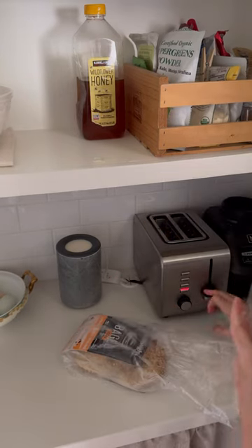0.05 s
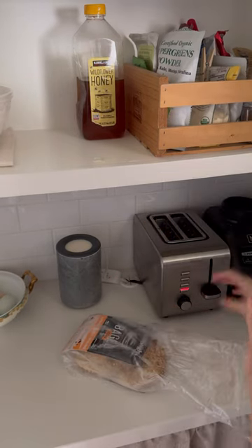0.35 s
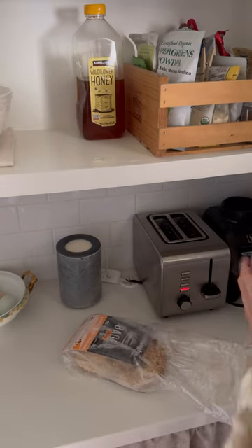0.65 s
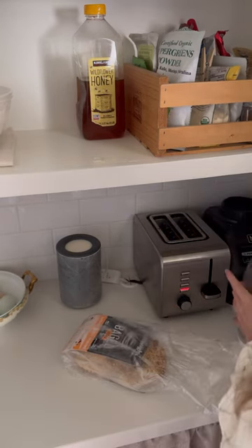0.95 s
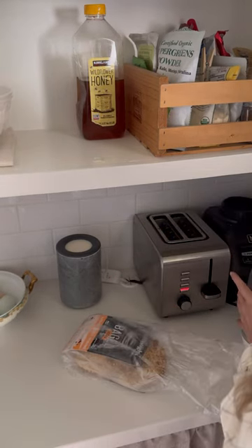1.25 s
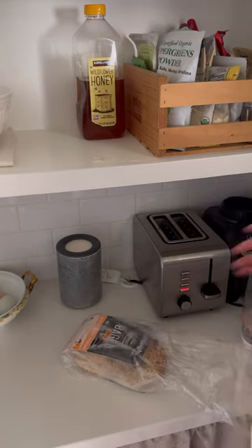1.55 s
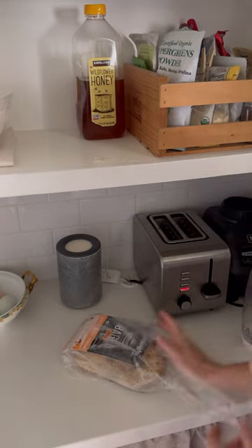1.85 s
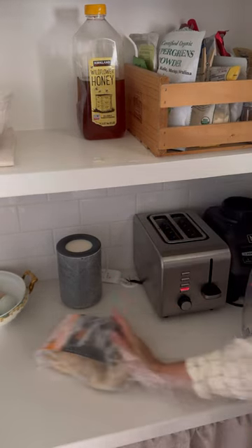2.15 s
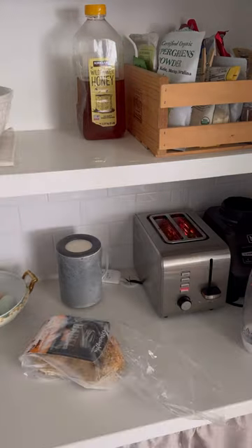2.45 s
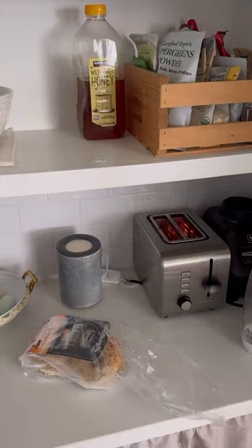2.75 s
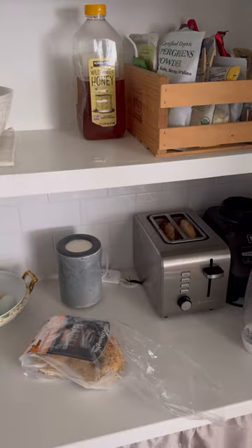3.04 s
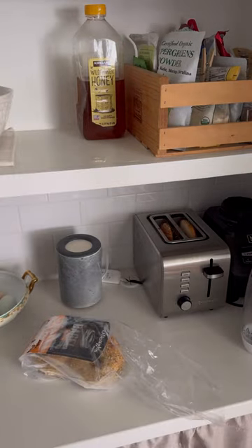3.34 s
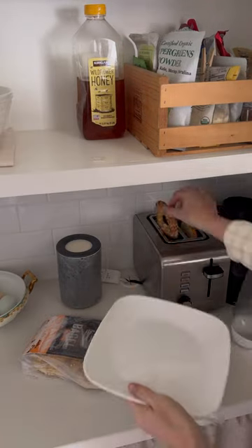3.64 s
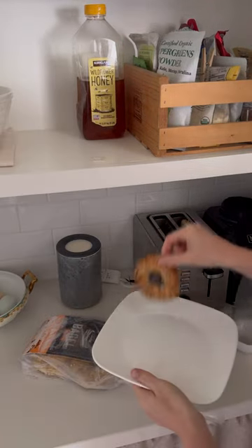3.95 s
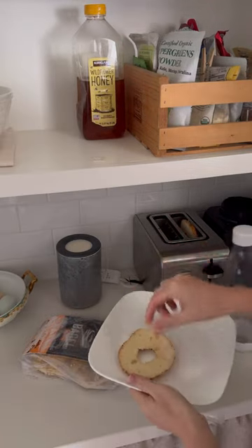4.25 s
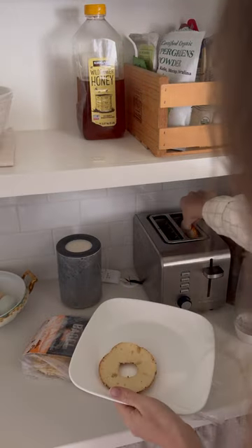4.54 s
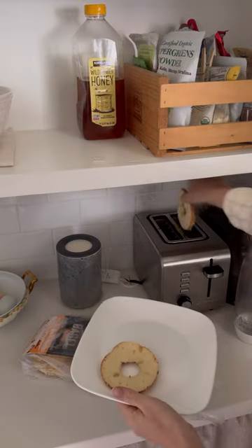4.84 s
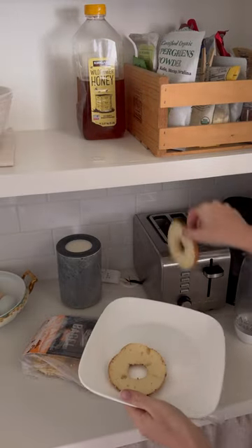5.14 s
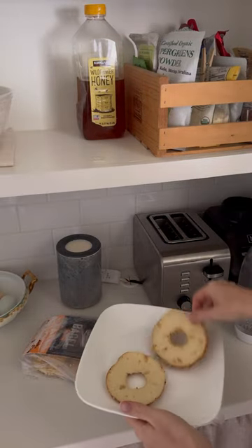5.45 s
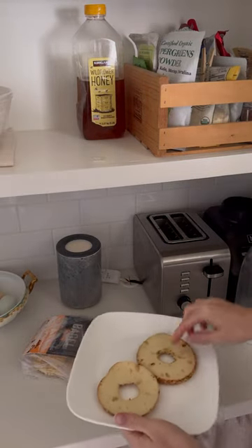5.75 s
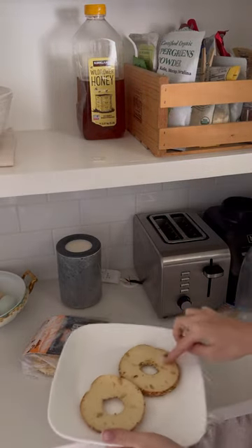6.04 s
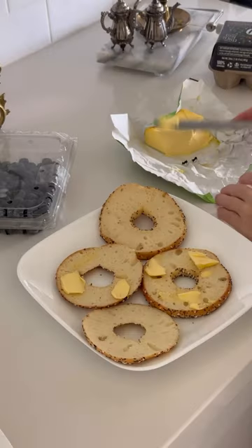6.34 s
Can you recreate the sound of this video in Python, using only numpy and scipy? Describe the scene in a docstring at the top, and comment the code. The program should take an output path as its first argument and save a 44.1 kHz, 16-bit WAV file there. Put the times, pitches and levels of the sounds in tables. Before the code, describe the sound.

A lever clicks, a plastic bag crinkles, then a toaster pops up with a loud metallic clatter and bagel halves tap onto a plate.

```python
"""A toaster pops up a bagel in a small kitchen: its sprung carriage chatters and strikes its stop.
Before that, a finger clicks the lever, something knocks on the counter and a hand crumples the plastic
bread bag. Afterwards two halves land on a china plate and a knife scrapes butter from its foil.
Impacts excite damped modes; rubbing is noise from many tiny slips. Room echo, rumble and hiss lie
behind, and a close pair of microphone ports hears it all."""
import sys
import numpy as np
from scipy import signal
from scipy.fft import rfft, irfft, next_fast_len
from scipy.io import wavfile
from scipy.ndimage import uniform_filter1d

SR = 44100
rng = np.random.default_rng(int(sys.argv[2]) if len(sys.argv) > 2 else 0)


def master_out(mix):
    """Clip the mix to full scale and print it as 16-bit PCM to the path in sys.argv[1]."""
    frames = np.transpose(np.atleast_2d(mix))
    ceiling = np.clip(frames, -1, 1)
    pcm = np.round(ceiling * 32767).astype(np.int16)
    wavfile.write(sys.argv[1], SR, pcm)


N = 291501

# latch release and carriage strikes, as impacts:
# (time [s], level [dB], bass [dB], treble [dB], contact time [s])
CARRIAGE_IMPACTS = [(2.6835, 12.5, -6, -25, 0.0011), (2.695, 15, -1.5, -23.5, 0.0043),
                    (2.7115, 12.5, -14, -2, 0.001), (2.716, 15.6, -10.5, -2.5, .0006),
                    (2.723, 15, -14, -15.5, 0.0011), (2.829, 10, -9, 2, .002), (2.8535, 10, -11, 1, .0012),
                    (2.992, -12, 3, 4.5, 0.0011)]
# chatter: (start [s], length [s], level [dB], bass [dB], treble [dB], contact time [s], fade [dB/s])
CARRIAGE_RATTLES = [(2.459, .075, -8.5, -6, -24.5, 0.003, 25.5), (2.582, .06, 0.5, 0.5, -51, 0.0017, 160),
                    (2.7925, .04, 10.5, 10, -3.5, 0.002, 11), (2.951, .075, 6, 7, -12, 0.0055, 281)]
# radiation spectrum: (frequency [Hz], gain [dB])
TOASTER_SPECTRUM = [(25, -21), (65, -2), (90, -6), (135, 2.5), (200, -14), (450, -2.5), (900, -3.5),
                    (1600, -4.5), (3500, -5), (5500, -5.5), (10000, 0.5), (14000, 1), (16000, 1.5)]
# modes: (frequency [Hz], level [dB], T60 [s])
TOASTER_MODES = [(305, -8, .3), (436, -6, .3), (560, -7, .2), (605, -9, .3), (697, -7, .16), (740, -5, .22),
                 (816, -1, .24), (886, -6, .22), (958, -5, .22), (1095, -2, .24), (1197, 3, .22),
                 (1260, -2, .18), (1346, 1, .22), (1400, -2, .18), (1487, -1, .22), (1646, 4, .15),
                 (1738, 5, .17), (1908, 1, .19), (2016, 0, .18), (2280, -4, .18), (2350, -3, .18),
                 (2520, -4, .18), (2839, -2, .16), (3085, -5, .15), (4300, -2, .18), (5282, 4, .17),
                 (5345, 2, .12), (5612, 2, .14), (6368, -2, .16), (7237, -2, .13), (8680, 3, .11),
                 (12617, 1, .15), (13634, -3, .14), (13977, -3, .14)]
def toaster(gap_s=.0208, brighten_db_per_s=68.5):
    """Repeated impact: the sprung carriage hits its stop and chatters, each rebound weaker and brighter."""
    chatter = [(start + age, db - fade * age, bass, treble + brighten_db_per_s * age, contact)
               for start, length, db, bass, treble, contact, fade in CARRIAGE_RATTLES
               for age in np.arange(0, length, gap_s)]
    return impacts(CARRIAGE_IMPACTS + chatter, TOASTER_SPECTRUM, crack_db=3.5, crack_s=.013,
                   t60_scale=.9, modes=TOASTER_MODES, ring_db=-2.5, detune=.005)


# finger ticks: (time [s], level [dB], bass [dB], treble [dB], contact time [s])
LEVER_IMPACTS = [(.097, -1, -2, -4.5, 0.0022), (.174, -26.5, -19, 14, 0.003), (.196, -30, 4, 20.5, 0.0037),
                 (.2485, -26, 7, 11, .0008), (.293, -28, 15, 7, 0.0084), (.328, -33, 1, 12.5, 0.0064),
                 (.411, -23, 24, 11.5, 0.0057)]
# radiation spectrum of the lever, plastic, crust and foil: (frequency [Hz], gain [dB])
CRISP_SPECTRUM = [(25, -5), (70, -9.5), (400, -2), (1000, -2.5), (2500, -4), (7000, -10), (10000, 2),
                  (15000, 0)]
# modes: (frequency [Hz], level [dB], T60 [s])
LEVER_MODES = [(345, -4, .18), (743, 0, .1), (1450, -4, .14), (2100, -4, .14), (3550, -11, .1),
               (4100, -11, .12)]
def lever():
    """Impulse excitation: a finger clicks the lever and its modes ring briefly."""
    return impacts(LEVER_IMPACTS, CRISP_SPECTRUM, crack_db=-.5, crack_s=.0027,
                   t60_scale=1, modes=LEVER_MODES, ring_db=-4.5, detune=.005)


# hand bumps: (time [s], level [dB], bass [dB], treble [dB], contact time [s])
HOUSING_IMPACTS = [(.394, -16, -2, -1, 0.045), (1.014, 4, -4.5, 7, 0.0013), (3.599, -11.5, -7, -2, 0.013),
                   (3.661, -3, 1.5, 0, 0.0034), (3.674, -5, 6.5, -19, 0.0024)]
# radiation spectrum: (frequency [Hz], gain [dB])
HOUSING_SPECTRUM = [(30, -2.5), (70, 3), (120, -3.5), (260, 1), (380, 3.5), (600, -1.5), (1100, -1.5),
                    (2000, -9.5), (4000, -23.5), (15000, -37.5)]
# modes: (frequency [Hz], level [dB], T60 [s])
HOUSING_MODES = [(140, -10, .19), (260, 0, .18), (470, -4, .16), (635, 0, .17), (980, -8, .12),
                 (1244, -11, .1)]
def housing():
    """Shell resonance: a hand bumps the toaster's housing and its low modes sound hollow."""
    return impacts(HOUSING_IMPACTS, HOUSING_SPECTRUM, crack_db=3.5, crack_s=.0095,
                   t60_scale=.6, modes=HOUSING_MODES, ring_db=-2.5, detune=.004)


# first contacts: (time [s], level [dB], bass [dB], treble [dB], contact time [s])
COUNTER_IMPACTS = [(.8785, 16, -3.5, -2.5, 0.00074), (1.0015, -1, -5, -6, 0.00044),
                   (1.985, -30, -3.5, -10, .0045), (2.125, -33, 18, -5, 0.0047)]
# radiation spectrum: (frequency [Hz], gain [dB])
COUNTER_SPECTRUM = [(25, -11.5), (60, -3.5), (90, -17.5), (130, 3.5), (200, -4), (400, 2), (700, -6.5),
                    (1050, -5.5), (1380, 0), (1750, -10.5), (2350, -2), (2750, -6), (3600, -5.5),
                    (4400, -10.5), (9400, -19.5), (15000, -20.5)]
# modes: (frequency [Hz], level [dB], T60 [s])
COUNTER_MODES = [(63, -6, .45), (118, -7, .28), (267, -5, .16), (303, -2, .2), (366, -9, .12),
                 (403, -7, .16), (460, -8, .13), (613, -9, .14), (974, -7, .14), (1281, -4, .12),
                 (1350, 0, .15), (1390, -1, .12), (1470, -4, .12), (1990, -7, .11), (2180, -4, .14),
                 (2277, -4, .14), (2425, -4, .13), (3168, -5, .11), (3545, -3, .1), (4306, -5, .11)]
def counter(first_gap_s=.0072, gap_growth=1.95, fade_db_per_s=352.5, bass_step_db=5, treble_step_db=-2.5):
    """Inelastic collision: each knock settles in four contacts, each weaker and duller than the last."""
    delays = first_gap_s * np.append(0, np.cumsum(gap_growth ** np.arange(3)))
    contacts = [(start + delay, db - fade_db_per_s * delay,
                 bass + k * bass_step_db, treble + k * treble_step_db, contact)
                for start, db, bass, treble, contact in COUNTER_IMPACTS for k, delay in enumerate(delays)]
    return impacts(contacts, COUNTER_SPECTRUM, crack_db=5, crack_s=.0098,
                   t60_scale=.62, modes=COUNTER_MODES, ring_db=-3.5, detune=.004)


# taps: (time [s], level [dB], bass [dB], treble [dB], contact time [s])
PLATE_IMPACTS = [(4.233, -2, -12, 3.5, 0.003), (4.31, -14.5, -12, 2, 0.0035),
                 (5.413, -7, -32, -8.5, 0.0012), (5.501, -5, -4, -7, 0.0014), (5.5085, 8, -3, -12, 0.0008),
                 (5.933, -22, -17, 1, 0.0054), (6.213, -6.5, -17, 8, 0.0012)]
# radiation spectrum: (frequency [Hz], gain [dB])
PLATE_SPECTRUM = [(60, -8), (250, -4.5), (500, -13), (900, -15.5), (1300, -9), (2100, -11.5), (2900, -9),
                  (4000, -18), (7000, -9), (11000, -9), (16000, -14)]
# modes: (frequency [Hz], level [dB], T60 [s])
PLATE_MODES = [(365, -17, .15), (471, -12, .15), (815, -10, .1), (888, 0, .19), (1061, -14, .12),
               (1585, -11, .17), (2099, -19, .13), (2960, -18, .11), (3410, -15, .17), (3845, -9, .17),
               (4411, -15, .15), (4473, -13, .16), (5609, -17, .14), (6019, -17, .14), (6200, -19, .13)]
def plate():
    """Free vibration: the china rings in inharmonic modes when toast or knife touches it."""
    taps = impacts(PLATE_IMPACTS, PLATE_SPECTRUM, crack_db=1, crack_s=.001,
                   t60_scale=.65, modes=PLATE_MODES, ring_db=4.5, detune=.002)
    return taps * gain_of([[-1], [1]])  # a little to the right


# weight of the knocks, hand, toast and knife: (time [s], envelope peak [dB], frequency [Hz])
THUDS = [(.8985, -29, 303), (.903, -30, 139), (.926, -32, 118), (1.003, -31, 368), (1.017, -34, 414),
         (1.031, -33, 128), (1.049, -38, 124), (2.003, -44, 85), (2.12, -50.5, 74.6), (5.5085, -29, 1550),
         (5.509, -39, 474), (6.116, -48, 100.2), (6.14, -50, 119.6), (6.276, -51.5, 190)]
def thuds(cycles_to_peak=.62):
    """Heavily damped oscillation: weight comes down on a surface, which swings for only a few cycles."""
    out = np.zeros((2, N))
    t = np.arange(round(.1 * SR)) / SR
    for start, db, hz in THUDS:
        age = t * hz / cycles_to_peak
        push = gain_of(db) * age * np.exp(1 - age) * np.sin(2 * np.pi * hz * t)
        add(out, start, np.array([push, push]))
    return out


# snaps and one knife bump: (time [s], level [dB], bass [dB], treble [dB], contact time [s])
SNAPS_AND_BUMP = [(1.493, -28, 4, 3, 0.011), (1.533, -22.5, -23, -7, 0.005),
                  (1.707, -3.5, -8.5, -19, 0.016), (1.789, -18, -12, 6, 0.00034),
                  (1.8495, -7, -11.5, -3.5, 0.0002), (1.905, -12, -12, -2, .0004),
                  (1.928, -6.5, -1, -7, 0.00077), (1.951, -7, -5, -6, 0.00047),
                  (1.987, -7, -10, -1, 0.00047), (2.001, -10.5, 3.5, 0, .0004),
                  (2.044, -13, -19, 3, 0.00043), (2.112, -13, -13, -0.5, 0.00035),
                  (2.188, -18, -8.5, -4, .0004), (2.27, -20.5, -11.5, -3, 0.00043),
                  (3.395, -27.5, -1, 1.5, 0.012), (4.234, -7.5, -15.5, -4, 0.0011),
                  (4.369, -34, 22, 15.5, 0.0097), (6.098, -9.5, 12.5, -42, 0.019),
                  (6.214, -11.5, -7, -13, 0.0017)]
def snaps_and_bump():
    """Unpitched transients: snaps of plastic, crust and foil, and one dull, low bump of the knife."""
    return impacts(SNAPS_AND_BUMP, CRISP_SPECTRUM, crack_db=0, crack_s=.0015, t60_scale=.7)


# presses of the hand: (start [s], length [s], rustle [dB], crackle [dB])
BAG_PRESSES = [(1.697, 0.078, -47.5, -45), (1.825, 0.21, -47, -44.5), (2.07, 0.15, -48.5, -48),
               (2.22, 0.097, -59, -59.5), (2.37, 0.13, -65.5, -63)]
def bag_crinkles(folds=7, wait_share=.45, boost_db=28, spread_db=3, bass_db=-25, contact_s=.0002):
    """Buckling: folds of the plastic bag snap at random moments in the later part of each press."""
    folding = [(start + length * (wait_share + (1 - wait_share) * when),
                crackle_db + boost_db + spread_db * (2 * force - 1), bass_db, 0, contact_s)
               for start, length, _, crackle_db in BAG_PRESSES for when, force in rng.random((folds, 2))]
    return impacts(folding, CRISP_SPECTRUM, crack_db=6, crack_s=.0006, t60_scale=.4)


def bag_rustle():
    """Stick-slip friction: the plastic slides under the hand, louder as each press goes on."""
    gains = strokes(BAG_PRESSES, attack_s=.022, swell_db_per_s=24.5, release_db_per_s=199.5)
    return friction(gains, rustle_db=2.5, crackle_db=.5, top_db=3, slips_per_s=700, spread_db=3.8)


# scrape: (start [s], length [s], rustle [dB], crackle [dB])
KNIFE_STROKES = [(6.093, 0.26, -44.5, -48.5)]
# resonances heard as the knife scrapes: (frequency [Hz], half-width [Hz], gain [dB])
SCRAPE_RESONANCES = [(188, 34, 10), (532, 120, 6), (940, 70, 6), (2470, 260, 3.5)]
def knife():
    """Forced vibration: the knife scrapes up butter and drives resonances, including the plate's ring."""
    gains = strokes(KNIFE_STROKES, attack_s=.012, swell_db_per_s=-80, release_db_per_s=600)
    return friction(gains, rustle_db=-1, crackle_db=-2, top_db=-8, slips_per_s=2950, spread_db=3,
                    resonances=SCRAPE_RESONANCES)


# rubs of the butter's foil: (start [s], length [s], rustle [dB], crackle [dB])
FOIL_STROKES = [(6.207, 0.006, -64, -45.5), (6.36, 0.06, -59.5, -53)]
def foil():
    """Stick-slip friction: very uneven slips make the foil crackle brightly."""
    gains = strokes(FOIL_STROKES, attack_s=.006, swell_db_per_s=-5, release_db_per_s=502)
    return friction(gains, rustle_db=-1, crackle_db=-4, top_db=7, slips_per_s=2100, spread_db=7.5)


# brush of the fingers: (start [s], length [s], rustle [dB], crackle [dB])
FINGER_STROKES = [(0.0, 0.052, -44, -42.5)]
def fingers():
    """Sliding friction: the fingers brush with a sudden, short hiss."""
    gains = strokes(FINGER_STROKES, attack_s=.00054, swell_db_per_s=-21, release_db_per_s=236)
    return friction(gains, rustle_db=-3.5, crackle_db=3, top_db=14, slips_per_s=2500, spread_db=-16)


# scuffs: (start [s], length [s], rustle [dB], crackle [dB])
CRUST_STROKES = [(4.222, 0.024, -56, -56), (4.51, 0.087, -70.5, -72)]
def crust():
    """Dry friction: the toasted crust rubs in faint, quickly swelling scuffs."""
    gains = strokes(CRUST_STROKES, attack_s=.01, swell_db_per_s=149, release_db_per_s=296)
    return friction(gains, rustle_db=0, crackle_db=1, top_db=0, slips_per_s=1500, spread_db=2)


# decay of a body's crowded modes, before t60_scale: (frequency [Hz], T60 [s])
BODY_T60 = [(100, 0.43), (500, 0.41), (2000, 0.26), (7000, 0.33), (15000, 0.11)]
def impacts(rows, spectrum, crack_db, crack_s, t60_scale, modes=(), ring_db=0, detune=0):
    """Modal superposition: each contact cracks, then the body's crowded and distinct modes ring out."""
    out = np.zeros((2, N))
    for start, db, bass_db, treble_db, contact_s in rows:
        body = diffuse_decay(BODY_T60, t60_scale, size=13000)
        t = np.arange(body.shape[1]) / SR
        onset = 1 - np.exp(-t / contact_s)  # a soft or sliding contact builds up slowly
        crack = unit(rng.standard_normal(body.shape) * onset * np.exp(-t / (crack_s + contact_s)))
        ring = np.zeros(body.shape)
        for hz, mode_db, t60 in modes:
            pitch = hz * (1 + detune * (2 * rng.random() - 1))  # loose parts sit differently at each blow
            phase = 2 * np.pi * (pitch * t + rng.random())
            envelope = gain_of(mode_db - 60 * t / t60)
            ring += envelope * np.array([np.sin(phase), np.cos(phase)])
        sound = unit(body * onset) + gain_of(crack_db) * crack + gain_of(ring_db) * unit(ring * onset)
        hardness = [(160, bass_db), (650, 0), (1500, 0), (5000, treble_db)]
        add(out, start, gain_of(db) * tint(unit(sound), spectrum, hardness))
    return out


# spectra of the dull and the bright part of rubbing: (frequency [Hz], gain [dB])
RUSTLE_SPECTRUM = [(25, -7), (70, 14), (130, 1.5), (250, -2), (500, 4.5), (1000, 3), (2200, 3.5),
                   (4000, 5.5), (7000, -25.5), (16000, -35.5)]
CRACKLE_SPECTRUM = [(100, -47), (2000, 0.5), (4500, 5), (7500, 5), (11000, -2.5), (15500, -1)]
def friction(gains, rustle_db, crackle_db, top_db, slips_per_s, spread_db, resonances=()):
    """Source and filter: the same slips give a dull rustle and a bright crackle, each with its own gain."""
    rustle_gain, crackle_gain = gains
    slips = slip_noise(slips_per_s, spread_db)
    peaks = [[(hz - width, 0), (hz, db), (hz + width, 0)] for hz, width, db in resonances]
    top_shelf = [(6500, 0), (11000, top_db)]
    rustle = gain_of(rustle_db) * rustle_gain * unit(tint(slips, RUSTLE_SPECTRUM, *peaks))
    crackle = gain_of(crackle_db) * crackle_gain * unit(tint(slips, CRACKLE_SPECTRUM, top_shelf))
    return np.sqrt(N) * (rustle + crackle)


def slip_noise(per_s, spread_db, snap_s=.0032, smear_s=.026):
    """Poisson process: slips of uneven size, each a noise burst smeared by the nearest surfaces."""
    sizes = gain_of(spread_db * np.minimum(rng.exponential(1, N), 4))
    sizes *= rng.random(N) < per_s / SR
    t = np.arange(4096) / SR
    burst = np.exp(-t / snap_s) / snap_s + .98 * np.exp(-t / smear_s) / smear_s
    power = abs(signal.oaconvolve(sizes ** 2, burst)[:N])
    return np.sqrt(power) * rng.standard_normal((2, N))


def strokes(rows, attack_s, swell_db_per_s, release_db_per_s):
    """Incoherent addition: strokes rise, hold and let go, summing in power to rustle and crackle gains."""
    power = np.zeros((2, N))
    for start, length, rustle_db, crackle_db in rows:
        age = np.maximum(np.arange(N) / SR - start, 0)
        shape_db = swell_db_per_s * np.minimum(age, length)
        shape_db -= release_db_per_s * np.maximum(age - length, 0)
        envelope = np.minimum(age / attack_s, 1) * gain_of(np.maximum(shape_db, -120))
        power += (gain_of([[rustle_db], [crackle_db]]) * envelope) ** 2
    return np.sqrt(power)


# reverberation time: (frequency [Hz], T60 [s])
KITCHEN_T60 = [(100, .6), (500, .48), (2000, .5), (7000, .42), (15000, .3)]
def kitchen_echo(sound, build_up_s=.0015):
    """Reverberation: convolution with the room's diffuse, decaying impulse response."""
    tail = diffuse_decay(KITCHEN_T60)
    t = np.arange(tail.shape[1]) / SR
    response = unit(tail * (1 - np.exp(-t / build_up_s)))
    return signal.oaconvolve(sound, response, axes=1)[:, :N]


# low drone after the pop and faint high whistle: (time [s], level [dB])
DRONE_LEVELS = [(2.8, -82), (2.95, -55), (3.2, -60), (3.57, -58.5), (3.66, -73)]
WHISTLE_LEVELS = [(6.1, -110), (6.25, -75), (6.61, -86.5)]
def tone(levels, hz, waver):
    """Frequency modulation: a sinusoid wavers slightly at random under a level curve."""
    times, db = np.transpose(levels)
    level = gain_of(np.interp(np.arange(N) / SR, times, db, left=-150, right=-150))
    wander = np.sqrt(N) * unit(uniform_filter1d(rng.standard_normal(N), size=2000))
    phase = 2 * np.pi * np.cumsum(hz * (1 + waver * wander)) / SR
    return np.sqrt(2) * level * np.array([np.sin(phase), np.cos(phase)])


# spectra of the room's noise: (frequency [Hz], gain [dB])
RUMBLE_SPECTRUM = [(20, -56.5), (55, -44.5), (120, -48.5), (260, -49.5), (500, -61.5), (1000, -69),
                   (2500, -70.5), (6000, -77), (16000, -87)]
HISS_SPECTRUM = [(100, -69.5), (1500, -84), (4000, -73), (7500, -63), (10000, -69), (12500, -67),
                 (15500, -78.5)]
# steady spells: (start [s], rumble gain [dB], hiss gain [dB])
NOISE_SPELLS = [(0, 5.5, 0.5), (2.52, 11, -9.5), (3.0, 6, -1), (3.75, 2, 1.4), (6.12, 1.5, -22)]
def background(shift_s=.065):
    """Filtered white noise: rumble and hiss hold steady, then shift to new levels."""
    starts, *levels = np.transpose(NOISE_SPELLS)
    spell = np.searchsorted(starts[1:], np.arange(N) / SR)
    rumble_gain, hiss_gain = (gain_of(uniform_filter1d(db[spell], round(shift_s * SR))) for db in levels)
    rumble = rumble_gain * tint(rng.standard_normal((2, N)), RUMBLE_SPECTRUM)
    hiss = hiss_gain * tint(rng.standard_normal((2, N)), HISS_SPECTRUM)
    return rumble + hiss


def diffuse_decay(t60, t60_scale=1, size=24576):
    """Modal overlap: countless modes or echoes merge into noise, each band dying at its own rate."""
    hz, t, bands = signal.stft(rng.standard_normal((2, size)), SR, nperseg=256)
    decay = gain_of(-60 * t / (t60_scale * read(t60, hz)[:, None]))
    return unit(signal.istft(bands * decay, SR, nperseg=256)[1][:, :size])


def tint(sound, *spectra, size=4096):
    """Minimum-phase filtering by the summed dB shapes, so nothing sounds before a blow."""
    hz = abs(np.fft.fftfreq(size, 1 / SR))
    log_gain = np.log(gain_of(sum(read(spectrum, hz) for spectrum in spectra)))
    response = np.exp(np.conj(signal.hilbert(log_gain)))
    taps = np.fft.ifft(response).real[:size // 2]
    return signal.oaconvolve(sound, taps[None], axes=1)[:, :sound.shape[1]]


def gain_of(db):
    """Decibels to amplitude."""
    return 10 ** (np.asarray(db) / 20)


def unit(x):
    """Normalises each channel to unit energy."""
    return x / np.sqrt(np.sum(x ** 2, axis=-1, keepdims=True) + 1e-20)


def read(points, hz):
    """Interpolates on a logarithmic frequency axis."""
    f, value = np.transpose(points)
    return np.interp(np.log(hz + 1), np.log(f + 1), value)


def add(mix, start_s, sound):
    """Superposes a stereo sound on the mix."""
    part = mix[:, round(start_s * SR):][:, :sound.shape[1]]
    part += sound[:, :part.shape[1]]


def scene():
    """Superposition: the direct sounds, their shares of reverberation and the background."""
    knocks = counter() + thuds()
    mechanism = lever() + toaster()
    bumps = housing()
    china = plate()
    handling = snaps_and_bump() + bag_crinkles() + fingers() + bag_rustle() + crust() + knife() + foil()
    echo = kitchen_echo(gain_of(-16) * (knocks + bumps) + gain_of(-11) * mechanism
                        + gain_of(-11.5) * handling + gain_of(-24) * china)
    drone = tone(DRONE_LEVELS, hz=86, waver=.0032)
    whistle = tone(WHISTLE_LEVELS, hz=4587, waver=.002)
    return mechanism + bumps + knocks + china + handling + echo + drone + whistle + background()


# share of the left signal in the right port: (frequency [Hz], amplitude share [0-1])
PORT_LIKENESS = [(60, .96), (250, .9), (600, .5), (1400, .3), (3000, .35), (6500, .2), (8000, .85),
                 (9500, .99), (12500, .75), (14000, .75), (15500, .92)]
# phase lag given to the right port: (frequency [Hz], lag [rad])
PORT_LAG = [(100, 0), (600, 0), (1400, -.6), (3200, .5), (5400, 0), (7000, 1.7), (8200, 2.9), (9800, 3.1),
            (12500, 1.8), (15500, .1)]
# level difference: (frequency [Hz], left minus right [dB])
PORT_BALANCE = [(100, 1.5), (800, -0.5), (1600, 0.5), (3200, 1.5), (5000, 3.5), (7300, 6.5), (8800, 1.5),
                (15000, -0.5)]
def record(dry, low_cut_hz=36, high_cut_hz=15850):
    """Coherence of two band-limited ports: in phase in the bass, opposed in the treble near 9 kHz."""
    size = next_fast_len(N + 4096)
    hz = np.fft.rfftfreq(size, 1 / SR)
    left, other = rfft(dry, size)
    likeness = read(PORT_LIKENESS, hz)
    right = likeness * left + np.sqrt(1 - likeness ** 2) * other
    right *= np.exp(-1j * read(PORT_LAG, hz))
    lean = gain_of(read(PORT_BALANCE, hz) / 2)
    pair = irfft(np.array([left * lean, right / lean]), size)[:, :N]
    high_pass = signal.butter(4, low_cut_hz, "high", fs=SR, output="sos")
    low_pass = signal.firwin(401, high_cut_hz, window=("kaiser", 8), fs=SR)
    return signal.oaconvolve(signal.sosfilt(high_pass, pair), low_pass[None], "same")


dry = scene()
out = record(dry)
master_out(out)
```